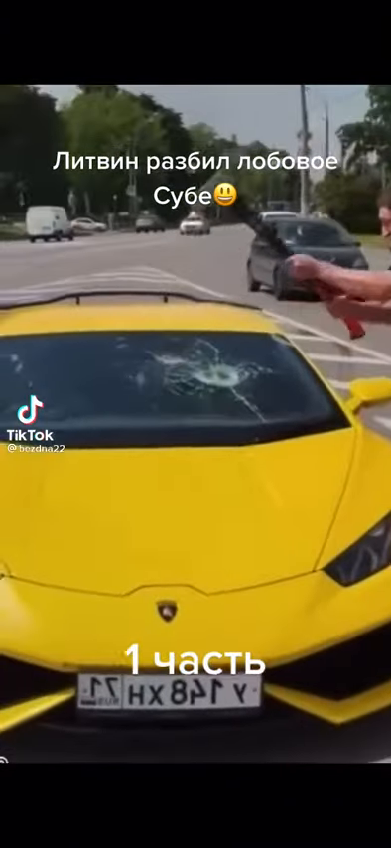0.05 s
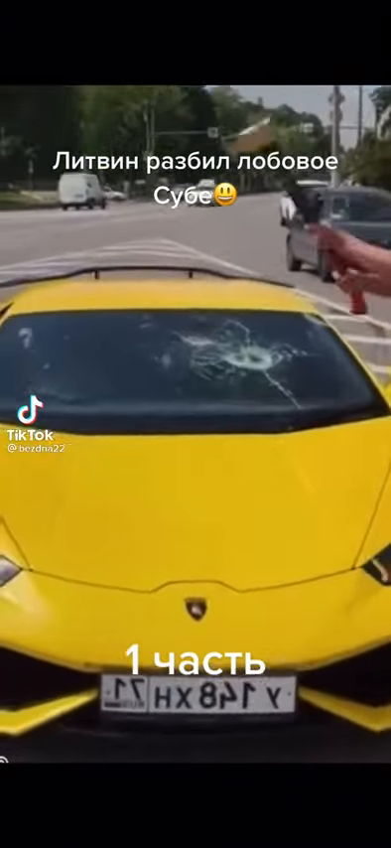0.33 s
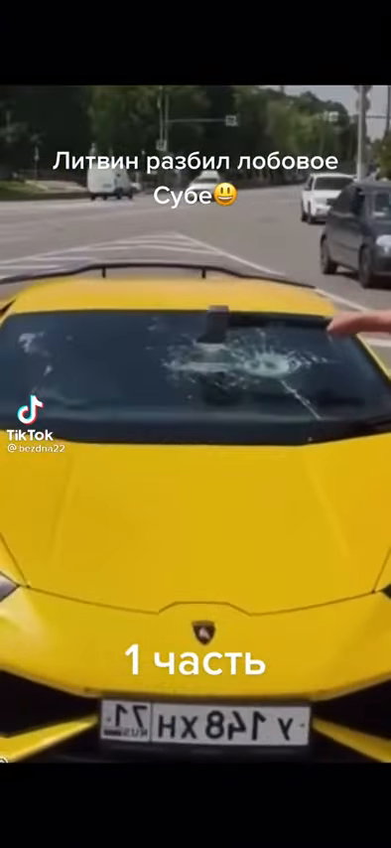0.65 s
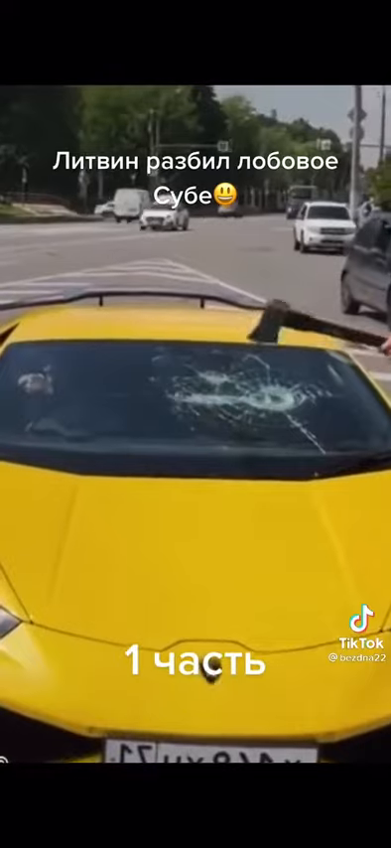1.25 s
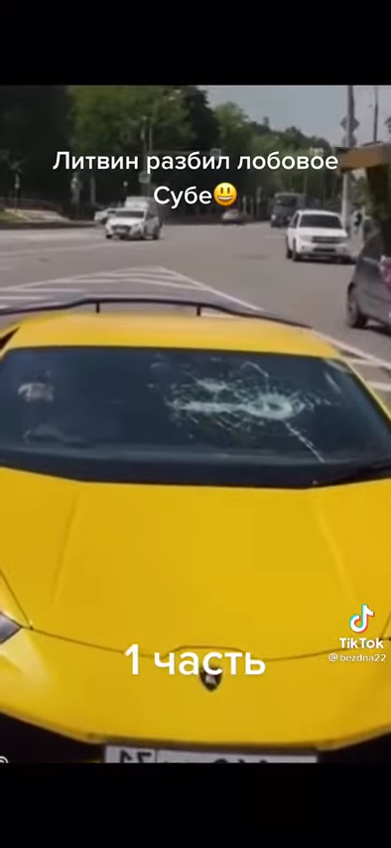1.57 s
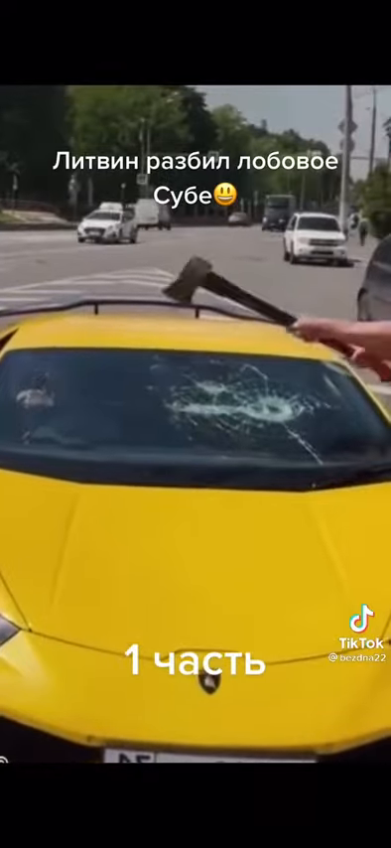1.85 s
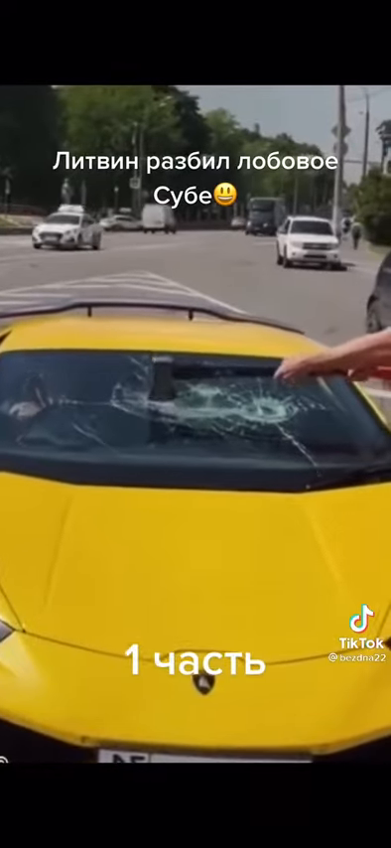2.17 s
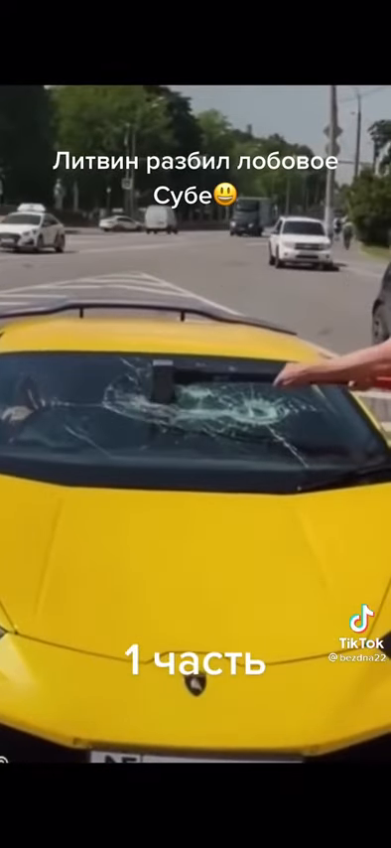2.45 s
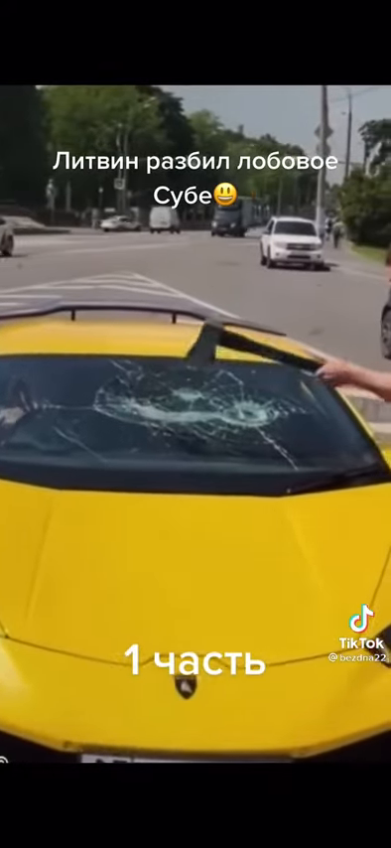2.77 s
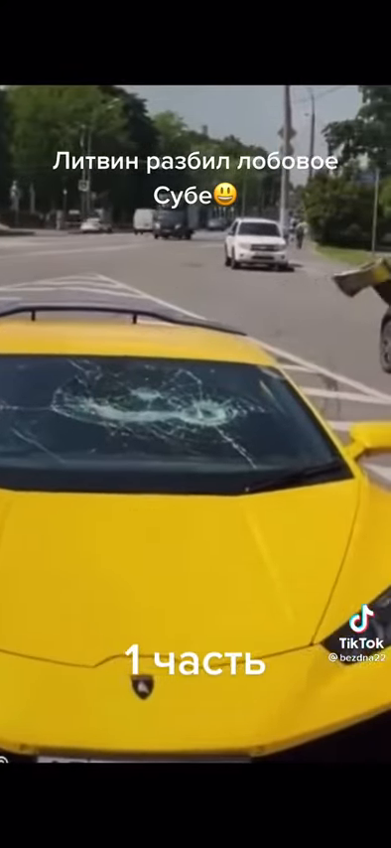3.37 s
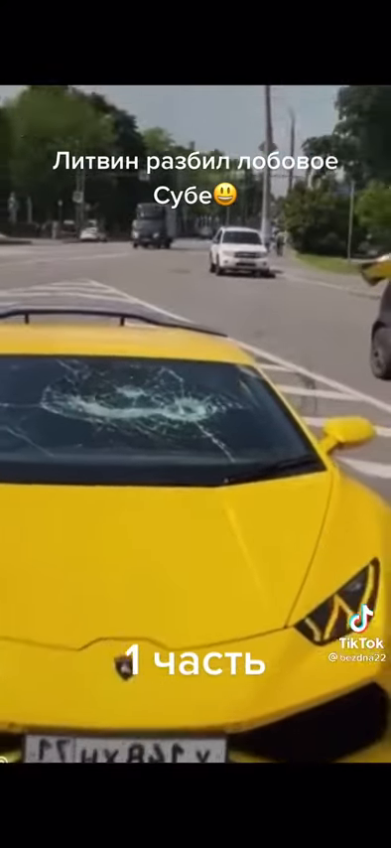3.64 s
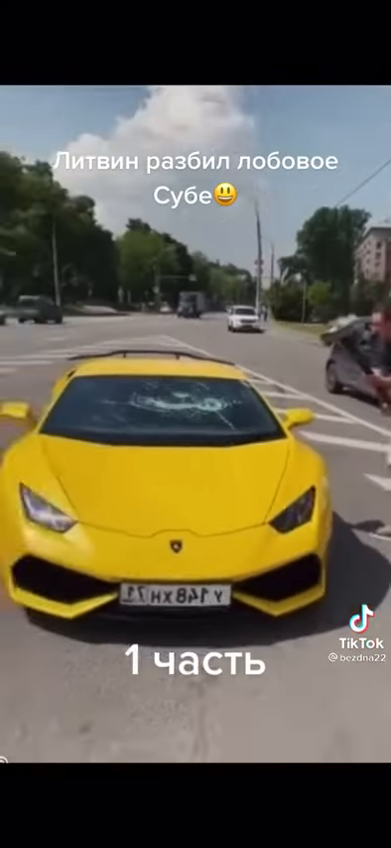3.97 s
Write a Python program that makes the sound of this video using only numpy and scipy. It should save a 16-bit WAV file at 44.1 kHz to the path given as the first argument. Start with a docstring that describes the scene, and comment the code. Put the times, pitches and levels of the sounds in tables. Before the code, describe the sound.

An axe strikes a car windshield twice, glass cracking over an idling engine and traffic.

```python
"""At a roadside, an axe hits a car's laminated windshield twice: a knock, a crunch of cracking glass
and a boom of the pane. The steel head rings faintly and tinks on the glass as it bounces, shifts and
is lifted off. A ten-cylinder engine idles with a lope close by, its firings shaking the exhaust
pipes. Traffic passes on the road behind: tyre noise over a low drone."""
import sys
import numpy as np
from scipy import signal
from scipy.fft import rfft, irfft
from scipy.io import wavfile
from scipy.ndimage import uniform_filter1d

SR = 44100
rng = np.random.default_rng(int(sys.argv[2]) if len(sys.argv) > 2 else 0)


def generate_wav(signal):
    """Clip the signal to [-1, 1] and save it as 16-bit WAV at the path in sys.argv[1]."""
    frames = np.transpose(np.atleast_2d(signal))
    scaled = np.clip(frames, -1, 1) * 32767
    pcm = np.round(scaled).astype(np.int16)
    wavfile.write(sys.argv[1], SR, pcm)


N = 176400
T = np.arange(N) / SR


def axe():
    """Blows make the pane knock (duller once broken) and boom; touches tink; both ring the head."""
    # axe on pane (time [s], knock [dB], boom [dB], head ring [dB], knock tilt about 1 kHz [dB/octave])
    blows = [(0.5448, -3, 2.5, -36, -0.5), (1.9133, -5, -31, -51, -5.5)]
    # light touches of the head on broken glass (time [s], tink [dB], head ring [dB])
    touches = [(0.594, -40, -29), (1.071, -33, -39), (1.1995, -52, -45.5), (1.997, -30, -53),
               (2.206, -28, -54)]
    # pane modes (frequency [Hz], level [dB], t60 [s])
    pane_modes = [(315, 4.5, 0.029), (391.5, 3, 0.036), (566, 3.5, 0.026), (780, -7.5, 0.016),
                  (1023, -9, 0.029), (1547, 0.5, 0.03), (2320, -6.5, 0.04), (2646, -4, 0.055),
                  (2857, -6, 0.051), (3880, -31, .02)]
    # steel-on-glass modes (frequency [Hz], level [dB], t60 [s])
    tink_modes = [(2500, -5, 0.084), (2710, -5.5, 0.07), (6200, -13, 0.045)]
    # steel head modes (frequency [Hz], level [dB], t60 [s])
    head_modes = [(2755, -12, .1), (7386, 0, .33), (7418, -11, .18), (7714, -13, .14), (8152, -17, .13),
                  (8748, -12, .1), (8974, -13, .1)]
    boom_delay_s, chafe_db = 0.016, 2
    blow_s, knock_db, boom_db, blow_ring_db, tilt_db = np.transpose(blows)
    touch_s, tink_db, touch_ring_db = np.transpose(touches)
    knock = sum((-1) ** k * ring(clicks(blow_s, knock_db + db + tilt_db * np.log2(hz / 1000)), hz, t60_s)
                for k, (hz, db, t60_s) in enumerate(pane_modes))
    boom = ring(clicks(blow_s + boom_delay_s, boom_db), hz=67.3, t60_s=0.23)
    tink = sum(ring(clicks(touch_s, tink_db + db), hz, t60_s) for hz, db, t60_s in tink_modes)
    head = sum(ring(clicks(blow_s, blow_ring_db + db) + clicks(touch_s, touch_ring_db + db), hz, t60_s)
               for hz, db, t60_s in head_modes)
    chafing = from_db(chafe_db * drift(rate_hz=110))  # the head chafes on the glass
    return knock + boom + tink + head * chafing


def cracking():
    """Cracks run as bursts of tiny snaps; each rings its own shards and shakes the sagging pane."""
    # crack bursts (time [s], level [dB], hold [s], t60 [s], treble [dB], treble centre [Hz], thud [dB])
    cracks = [(0.537, -24, 0.001, .01, -22, 5000, -12), (0.5436, -15, 0.0057, .014, 1, 7850, 4),
              (0.551, -24, .003, .015, 10, 7600, -14), (0.553, -18, 0.0068, 0.013, 14.5, 7960, -5),
              (0.567, -30.5, .01, .04, 4, 8000, -10), (0.575, -21, .0015, .007, 8, 6500, -3),
              (0.579, -35, 0.018, 0.057, 7.5, 8500, -11), (1.069, -40.5, .003, 0.018, -5, 6900, -11),
              (1.908, -29, 0.0034, .015, 3, 6500, -1.5), (1.9123, -13, 0.0034, 0.023, -4, 7040, -2),
              (1.917, -19.5, 0.0023, .025, 1, 6660, 0), (1.923, -19.5, 0.0033, .03, 7, 6900, 6),
              (1.929, -20.5, 0.0027, 0.023, 6, 6600, 6.5), (1.935, -21, 0.00086, 0.039, 7, 6300, 8.5),
              (1.9385, -26, 0.0048, 0.04, 0, 5800, 0), (1.9483, -27, 0.0033, 0.022, 1, 6500, 9),
              (1.953, -22, 0.0023, 0.037, -1.5, 5970, -6), (1.974, -44.5, 0.01, 0.33, 5.5, 6000, -9),
              (2.15, -47.5, 0.083, 0.17, -2.5, 6200, -6.5), (2.203, -41, 0.003, .03, -3, 6500, -5),
              (2.358, -49, .04, 0.079, -1, 6500, -12)]
    # typical shard resonances (frequency [Hz], width [Hz], relative level [dB])
    shard_modes = [(2680, 340, -11), (5670, 260, -4), (6400, 180, 4), (6560, 490, -2), (7170, 140, 2),
                   (7600, 150, 5.5), (7670, 120, 5.5), (8710, 180, 4.5)]
    # spectrum of the crunch's body (frequency [Hz], relative density [dB])
    body_spectrum = [(250, -16.5), (500, -0.5), (900, -5), (1500, 3), (1950, -4), (2750, 3), (3300, 4),
                     (4100, 3.5), (5000, -3), (9000, -26)]
    # spectrum of its treble (frequency [Hz], relative density [dB])
    treble_spectrum = [(3000, -22.5), (5000, 8), (6500, 6.5), (7800, 6.5), (9200, -1)]
    snaps_per_s, snap_spread_db, splinter_hiss = 3000, 1.5, 0.93
    shards_db, shard_scatter = -1.5, .03
    thud_hz, thud_width_hz = 550, 300
    length = SR // 4
    age_s = T[:length]
    body, treble, shards, thud = np.zeros((4, N))
    for start_s, db, hold_s, t60_s, treble_db, centre_hz, thud_db in cracks:
        span = slice(int(start_s * SR), int(start_s * SR) + length)
        sizes = from_db(snap_spread_db * np.minimum(rng.exponential(1, length), 3))
        signs = rng.choice([-1, 1], length)
        snaps = rms_one(sizes * signs * (rng.random(length) < snaps_per_s / SR))
        envelope = from_db(db - 60 * np.maximum(age_s - hold_s, 0) / t60_s)
        crunch = envelope * rms_one(snaps + splinter_hiss * rng.standard_normal(length))
        bright = from_db(treble_db) * resonate(crunch, centre_hz, width_hz=1360)
        body[span] += crunch
        treble[span] += bright
        thud[span] += from_db(thud_db) * envelope * rng.standard_normal(length)
        for k, (hz, width_hz, mode_db) in enumerate(shard_modes):
            gain = from_db(mode_db + shards_db) * np.sqrt(SR / (np.pi * width_hz * len(shard_modes)))
            shard_hz = hz * (1 + shard_scatter * rng.standard_normal())
            shards[span] += (-1) ** k * gain * resonate(bright + 0.59 * crunch, shard_hz, width_hz)
    sag = np.sqrt(SR / (np.pi * thud_width_hz)) * resonate(thud, thud_hz, thud_width_hz)
    return colour(body, body_spectrum) + 0.51 * colour(treble, treble_spectrum) + shards + sag


def echoes(x):
    """Dull reflections from the road and nearby cars."""
    # reflections (delay [s], level [dB])
    reflections = [(.021, -17.5), (.048, -19), (.083, -40)]
    dull = signal.sosfilt(signal.butter(1, 5900, fs=SR, output="sos"), x)
    return sum(from_db(db) * np.interp(T - delay_s, T, dull, left=0) for delay_s, db in reflections)


def engine():
    """Exhaust tones swell once a four-stroke cycle; uneven firings shake the pipe resonances."""
    # idle speed (time [s], speed [rpm])
    idle_rpm = [(0.0, 784), (0.25, 800), (0.5, 798), (0.75, 801), (1.0, 815), (1.25, 815), (1.5, 827),
                (1.75, 817), (2.0, 816), (2.25, 808), (2.5, 799), (2.75, 791), (3.0, 788), (3.25, 786),
                (3.5, 798), (3.75, 790), (4.0, 789)]
    # exhaust tones (order [multiple of the cycle rate], relative level [dB])
    exhaust_orders = [(10, -30.5), (15, -37.5), (22, -34), (23, -25.5), (24, -22.5), (25, -24), (26, -45),
                      (29, -37), (30, -25.5), (31, -31), (33, -41.5), (38, -43.5), (40, -26), (45, -27.5),
                      (46, -42), (55, -38.5), (56, -47), (70, -39.5)]
    # pipe resonances (frequency [Hz], nominal width [Hz], rms level [dB])
    pipe_modes = [(71.2, 15.6, -27), (105.2, 17, -35.5), (154.7, 42, -30.5), (201.8, 14, -29),
                  (268.1, 21.3, -27), (294.3, 17, -30), (355.3, 19, -38), (472.5, 23, -40)]
    cylinders, tones_db, waver_db = 10, 2.1, 0.35
    align_at_cycle, spread_rad = .71, 1.03
    lope_db, lope_at_cycle = 1.3, 0.87
    dip_db, dip_at_cycle, dip_width_cycles = 1.9, .42, 0.13  # the weakest cylinders
    cycle = np.cumsum(in_time(idle_rpm) / 120) / SR
    strongest = max(exhaust_orders, key=lambda row: row[1])[0]
    tones = pipes = 0
    for order, db in exhaust_orders:
        phase = 2 * np.pi * order * (cycle - align_at_cycle) + spread_rad * (order - strongest) ** 2
        tones += from_db(db + tones_db + waver_db * drift(rate_hz=4.5)) * np.cos(phase)
    firings = np.diff(np.floor(cycle * cylinders), prepend=0)
    for hz, width_hz, db in pipe_modes:
        pulses = firings * rng.standard_normal(N)
        pipes += from_db(db) * rms_one(resonate(resonate(pulses, hz, 2 * width_hz), hz, 2 * width_hz))
    swell_db = lope_db * np.cos(2 * np.pi * (cycle - lope_at_cycle))
    cycles_from_dip = (cycle - dip_at_cycle + .5) % 1 - .5
    sag_db = dip_db * np.exp(-(cycles_from_dip / dip_width_cycles) ** 2)
    return (tones + pipes) * from_db(swell_db - sag_db)


def tyres():
    """Tyre noise of two cars, one driving off and one drawing near."""
    # leaving car (time [s], level [dB])
    leaving_db = [(0, -21), (.45, -22.5), (.7, -25), (1.2, -27), (1.85, -31.5), (2.3, -31), (2.7, -34),
                  (4, -27.5)]
    # its tyres (frequency [Hz], relative density [dB])
    leaving_spectrum = [(150, -10), (400, 2.5), (700, 0.5), (860, -0.5), (1150, 0), (1600, -6.5),
                        (1900, -16), (2700, -20), (3400, -23), (5000, -27), (9000, -43)]
    # nearing car (time [s], level [dB])
    nearing_db = [(0, -50.5), (1.85, -40), (2.7, -33), (3.15, -26.5), (3.6, -25.5), (4, -24)]
    # its tyres (frequency [Hz], relative density [dB])
    nearing_spectrum = [(150, -3.5), (400, 2), (800, 1), (1030, 4.5), (1300, -0.5), (1600, -3.5),
                        (1900, -8), (2700, -15.5), (3400, -23), (5000, -28), (9000, -33)]
    return sum(from_db(in_time(level_db) + .5 * drift(rate_hz=1.5)) * noise(spectrum)
               for level_db, spectrum in ((leaving_db, leaving_spectrum), (nearing_db, nearing_spectrum)))


def street():
    """Wavering traffic drone, low rumble and steady hiss."""
    # traffic drone (time [s], level [dB])
    drone_db = [(0, -26), (.5, -25), (1.05, -22), (1.3, -32), (1.55, -34), (1.9, -31), (2.05, -18.5),
                (2.6, -21), (3.05, -22), (3.3, -13.5), (3.55, -29), (4, -18)]
    # rumble of engine and street (time [s], level [dB])
    rumble_db = [(0, -24.5), (.6, -22), (1.05, -20), (1.4, -20.5), (1.8, -23.5), (2.25, -22), (2.7, -26.5),
                 (3.3, -25), (4, -24.5)]
    # rumble spectrum (frequency [Hz], relative density [dB])
    rumble_spectrum = [(22, -5), (35, -12), (55, -1), (85, -7), (130, -10), (220, -10.5), (330, -21.5),
                       (500, -21.5), (900, -45)]
    # hiss spectrum (frequency [Hz], relative density [dB])
    hiss_spectrum = [(500, -4), (2000, 8.5), (4000, 0.5), (5200, -5.5), (7500, -4.5), (9500, -20)]
    drone_hz = 70.5 + 2.364 * drift(rate_hz=5.25)
    drone = from_db(in_time(drone_db)) * np.sin(2 * np.pi * np.cumsum(drone_hz) / SR)
    rumble = from_db(in_time(rumble_db)) * noise(rumble_spectrum)
    hiss = from_db(-42.5) * noise(hiss_spectrum)
    return drone + rumble + hiss


def from_db(db):
    """Decibels to gain."""
    return 10 ** (np.asarray(db) / 20)


def rms_one(x):
    """Scale to unit rms."""
    return x / np.sqrt(np.mean(x ** 2) + 1e-20)


def in_time(rows):
    """(time [s], value) rows interpolated at every sample."""
    return np.interp(T, *np.transpose(rows))


def drift(rate_hz):
    """Smooth random wander of about unit rms."""
    hop, settle_steps = 100, 1000
    r = np.exp(-2 * np.pi * hop * rate_hz / SR)
    steps = rng.standard_normal(N // hop + settle_steps + 2)
    slow = signal.lfilter([1], [1, -2 * r, r * r], steps)[settle_steps:]
    return np.interp(np.linspace(0, len(slow) - 1, N), np.arange(len(slow)), rms_one(slow))


def colour(x, spectrum):
    """Minimum-phase filter from (frequency [Hz], level [dB]) rows; keeps the power of white noise."""
    size, skirt_db_per_octave = 4096, 20
    hz, db = np.transpose(spectrum)
    octaves = np.log2(np.maximum(np.arange(size // 2 + 1), .5) * SR / size)
    outside = np.abs(octaves - np.clip(octaves, np.log2(hz[0]), np.log2(hz[-1])))
    gain = rms_one(from_db(np.interp(octaves, np.log2(hz), db) - skirt_db_per_octave * outside))
    cepstrum = irfft(np.log(gain))
    cepstrum[1:size // 2] *= 2
    cepstrum[size // 2 + 1:] = 0
    return signal.fftconvolve(x, irfft(np.exp(rfft(cepstrum))))[:N]


def noise(spectrum):
    """Coloured noise of about unit rms."""
    return colour(rng.standard_normal(N), spectrum)


def ring(x, hz, t60_s):
    """Damped mode: a unit click starts a sine of height 1."""
    r, w = from_db(-60 / (t60_s * SR)), 2 * np.pi * hz / SR
    return signal.lfilter([0, np.sin(w)], [1, -2 * r * np.cos(w), r * r], x + 1e-18)


def resonate(x, hz, width_hz):
    """Band-pass resonance with unit peak gain."""
    r, w = np.exp(-np.pi * width_hz / SR), 2 * np.pi * hz / SR
    return signal.lfilter(np.array([1, 0, -1]) * (1 - r * r) / 2, [1, -2 * r * np.cos(w), r * r], x + 1e-18)


def clicks(times_s, db):
    """One impulse at each time."""
    out = np.zeros(N)
    out[np.clip((times_s * SR).astype(int), 0, N - 1)] = from_db(db)
    return out


def scene():
    """The blows in front of the idling engine and the road, in mono."""
    hits = axe() + cracking()
    return (hits + echoes(hits) + engine() + tyres() + street())[None]


def record(dry):
    """The top is cut and a limiter ducks everything under the blows."""
    cutoff_hz, limit_db, attack_s, release_db_per_s = 9200, -4, 0.0016, 213
    top_cut = signal.ellip(8, .3, 50, cutoff_hz, fs=SR, output="sos")
    x = signal.sosfilt(top_cut, dry[0])
    over_db = np.maximum(20 * np.log10(np.abs(x) + 1e-9) - limit_db, 0)
    held_db = np.maximum.accumulate(over_db + release_db_per_s * T) - release_db_per_s * T
    ahead_db = np.interp(T + attack_s / 2, T, held_db)
    duck_db = uniform_filter1d(ahead_db, int(attack_s * SR))
    return signal.sosfilt(top_cut, x * from_db(-duck_db))[None]


dry = scene()
out = record(dry)
generate_wav(out)
```